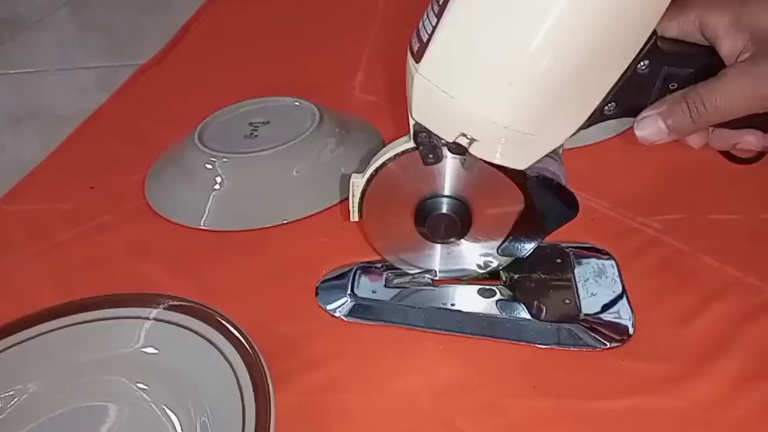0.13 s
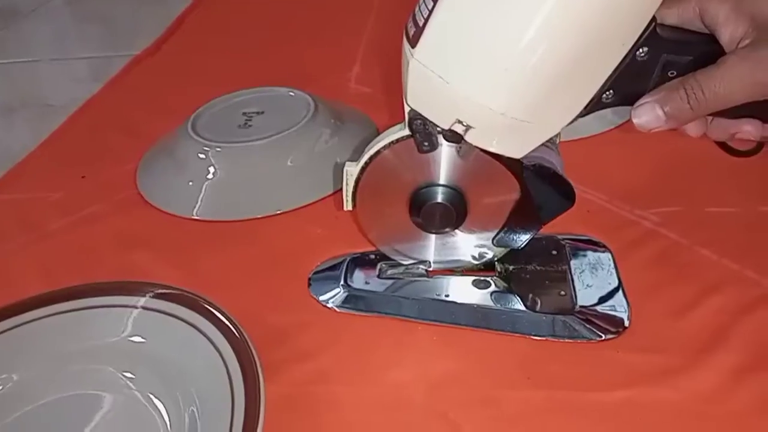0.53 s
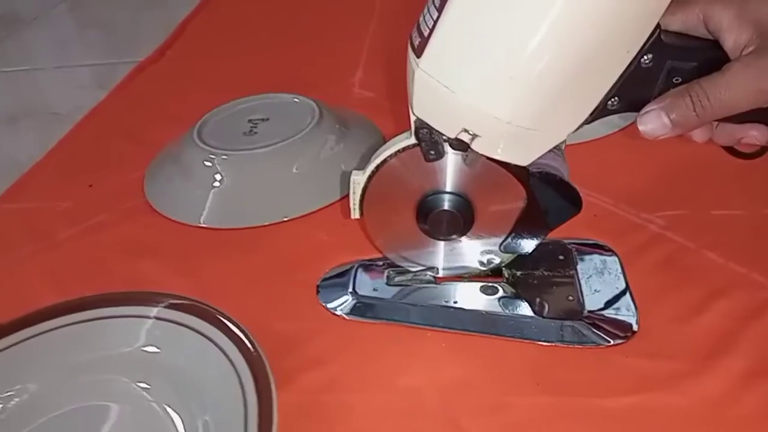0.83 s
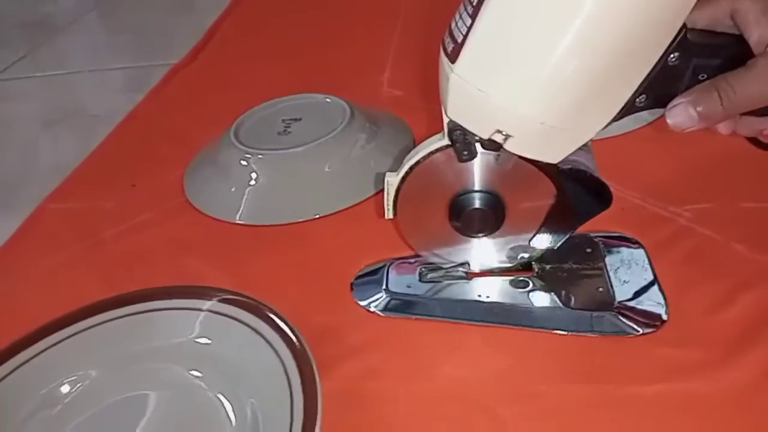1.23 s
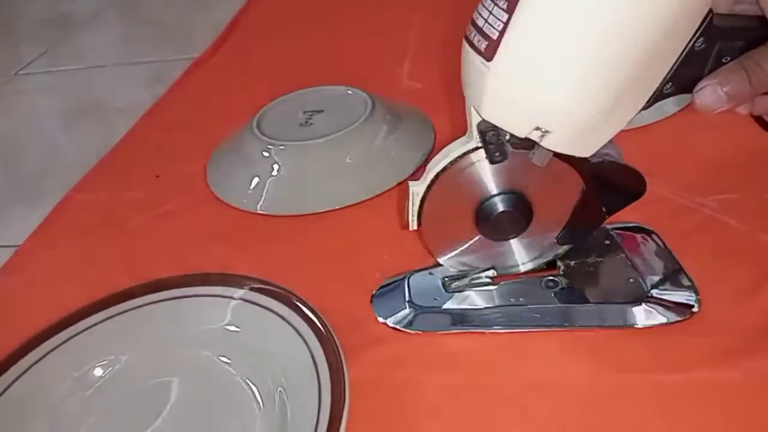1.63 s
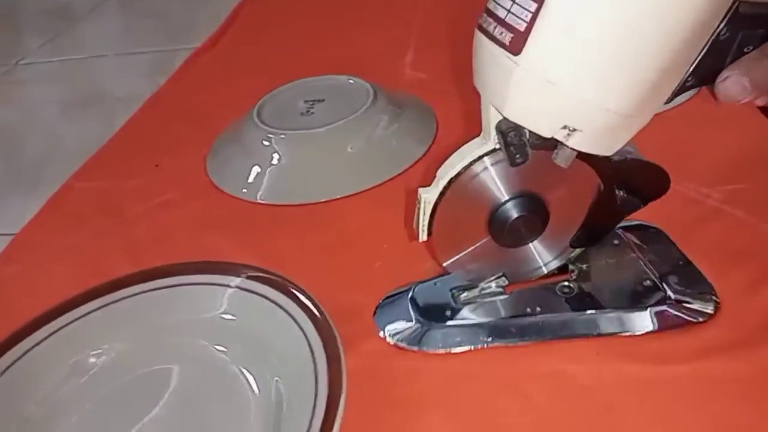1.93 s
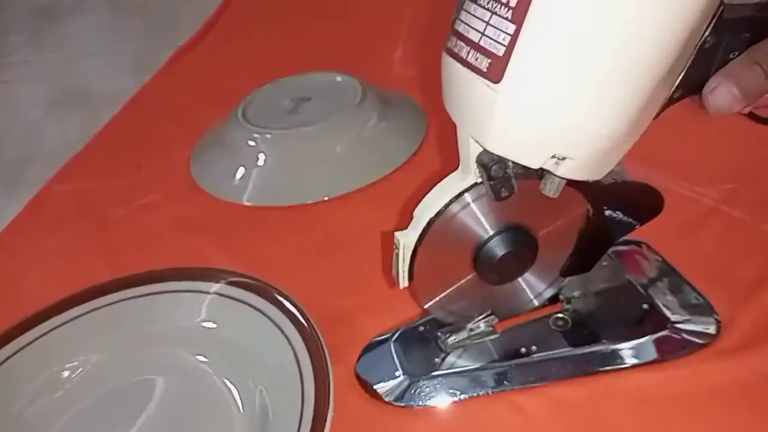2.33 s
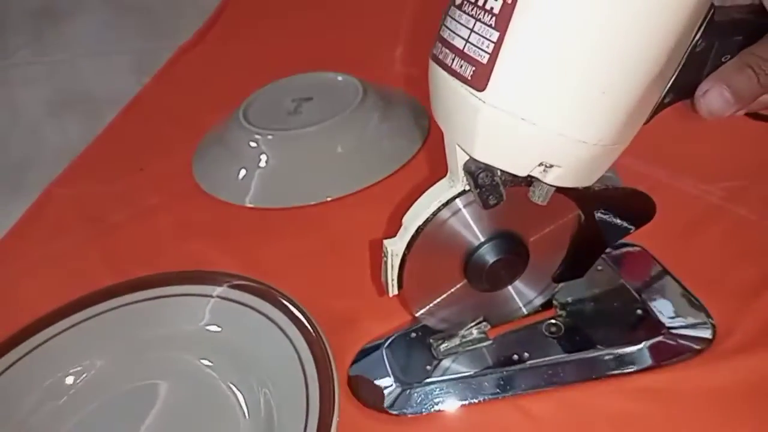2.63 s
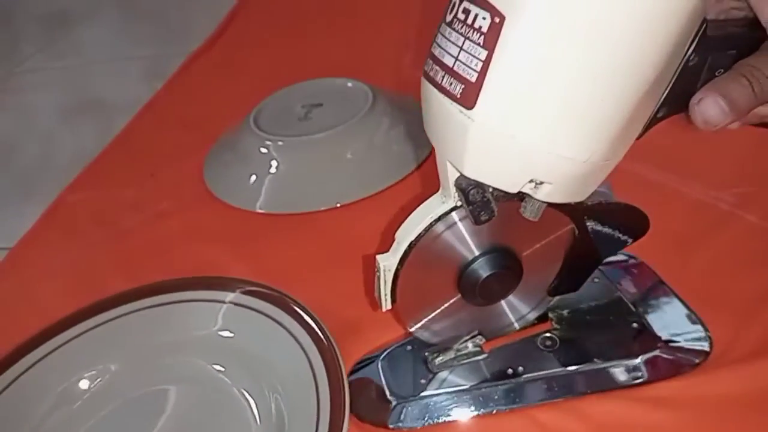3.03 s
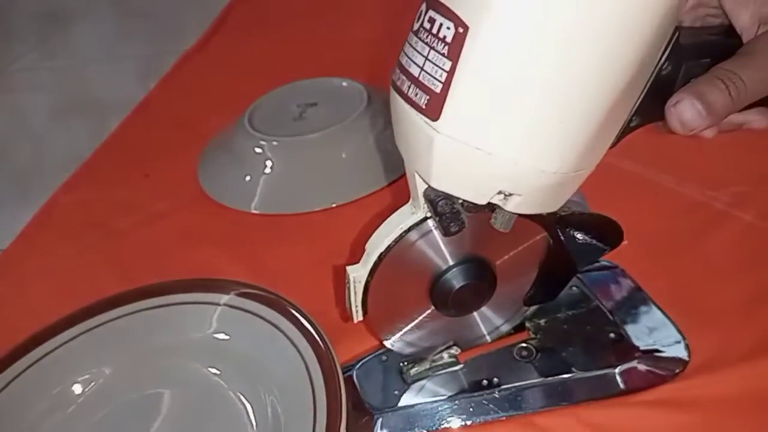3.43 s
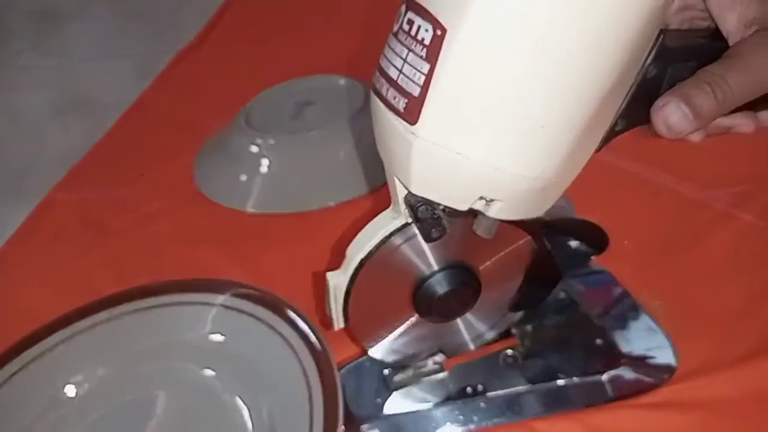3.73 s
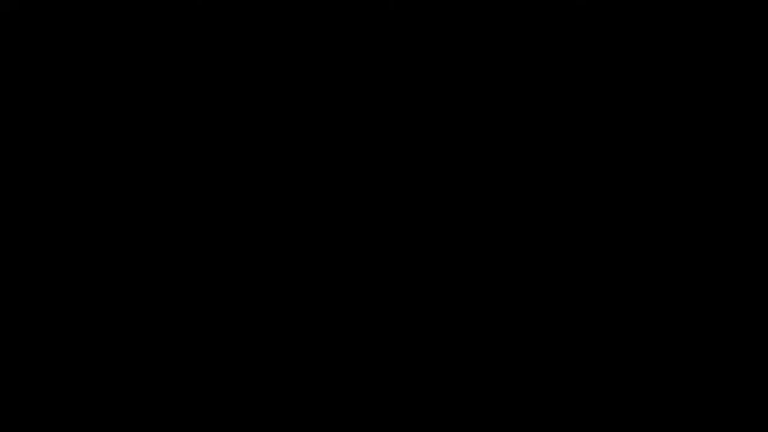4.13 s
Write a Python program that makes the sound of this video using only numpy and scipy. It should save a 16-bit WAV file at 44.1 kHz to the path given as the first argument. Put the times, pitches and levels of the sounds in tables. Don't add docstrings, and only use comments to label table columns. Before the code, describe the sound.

The sound fades in from silence over roughly 0.1-0.3 s: a small fast brushed motor in a round-blade cloth cutter, very close in a quiet room. Its pitch climbs quickly in the first second, with passing resonant swells, then creeps up only slightly. A broad, rough brush and fan hiss is strong at first, then phone noise suppression clamps it around 0.5-0.9 s, leaving thinner, streaky noise. From about 1.3 s the gear whine stands out, near 1.7 kHz, fluttering and beating over a faint low hum, with loose gear rattle and base-plate buzz. Thin steel ticks around 5-6 kHz occur irregularly from 0.3 s, clustering at 2.2-2.8 s and again around 3.7-4.1 s. Blade scraping on the guard is strongest near 3.9 s. At about 4.1 s the switch is released; whine and hiss weaken and pitch begins dropping, and the sound ends at about 4.3 s before it stops.

```python
import sys
import numpy as np
from scipy import signal
from scipy.fft import rfft, irfft
from scipy.io import wavfile
from scipy.ndimage import uniform_filter1d, map_coordinates

SR = 44100
rng = np.random.default_rng(int(sys.argv[2]) if len(sys.argv) > 2 else 0)


def volts(x):
    e = np.asarray(x, float) / 20
    return 10 ** e


def dump(signal):
    limited = np.clip(np.atleast_2d(signal).T, -1, 1)
    pcm = np.round(limited * 32767).astype(np.int16)
    wavfile.write(sys.argv[1], SR, pcm)


N = 189144
T = np.arange(N) / SR


def unit(x):
    return x / np.sqrt(np.mean(x ** 2) + 1e-20)


def curve(rows):
    time_s, value = np.transpose(rows)
    return np.interp(T, time_s, value)


def along(points, hz):
    point_hz, value = np.transpose(points)
    return np.interp(np.log(hz + 1), np.log(point_hz), value)


def step(x, width):
    return .5 + .5 * np.tanh(x / abs(width))


def wobble(rate):
    knots = rng.standard_normal(int(N * rate / SR) + 4)
    return map_coordinates(knots, [T * rate], order=1)


def window(start_s, end_s, ramp_s):
    return np.clip(np.minimum(T - start_s, end_s - T) / ramp_s, 0, 1)


def filtered(x, order, hz, kind):
    return signal.sosfilt(signal.butter(order, hz, kind, fs=SR, output="sos"), x)


def patchy(depth_db):
    z = signal.stft(rng.standard_normal(N + 1024), nperseg=1024)[2]
    field = uniform_filter1d(rng.standard_normal(z.shape), size=3, axis=0)
    field = uniform_filter1d(field, size=5, axis=1)
    return signal.istft(z * volts(depth_db * unit(field)), nperseg=1024)[1][:N]


# pitch_hz [Hz], level_db [dB per Hz]
CASING_LOW = [(35, -78), (60, -36), (183, -4), (245, -2), (313, -20.5), (512, -17.5), (688, -15.5),
              (746, -20), (986, -18), (1240, -5.5), (1440, -11.5), (1720, -4.5), (1810, -5), (2160, -12.5),
              (3000, -16), (3900, -55), (6600, -120)]
CASING_MID = [(1530, -44), (2600, -15), (3330, -10), (3490, -12), (3620, -8.5), (4040, -5.5), (4430, -8),
              (4700, -12), (5060, -4.5), (5330, -4), (6060, 0), (6490, -5.5), (6670, -11.5), (7210, -14.5),
              (7800, -23), (10100, -50), (17200, -120)]
CASING_HIGH = [(4120, -38), (7000, 5), (8190, -23.5), (9240, -11), (10700, -0.5), (11900, -4),
               (12500, -14.5), (13700, -42), (14900, -13), (15600, -5.5)]
# pitch_hz [Hz], width_hz [Hz], level_db [dB]
PANELS = [(442, 87, 4.5), (506, 11, 6), (727, 32, 4), (1300, 9.5, 3), (1735, 42, 2.5), (1880, 61, 2.5),
          (2657, 82, 5), (3510, 24, 6.5), (3850, 11, -5), (3863, 130, 3.5), (4066, 79, 5.5), (4340, 55, 7),
          (4674, 130, 7.5), (5050, 32, -2.5), (5520, 17, -1), (6330, 20, -5)]


def casing_db(hz):
    ranges = [along(CASING_LOW, hz), along(CASING_MID, hz) - 8]
    broad = np.select([hz < 2900, hz < 7700], ranges, along(CASING_HIGH, hz) - 15)
    peaks = sum(db / (1 + (2 * (hz - center_hz) / width_hz) ** 2) for center_hz, width_hz, db in PANELS)
    return broad + peaks


def band(x, lo_hz, hi_hz, steep=12):
    hz = np.fft.rfftfreq(N, 1 / SR) + 1
    edges = 1 / np.sqrt((1 + (lo_hz / hz) ** steep) * (1 + (hz / hi_hz) ** steep))
    return irfft(rfft(x) * volts(casing_db(hz)) * edges, N)


OFF_S = 4.12


def speed():
    free_hz, cold_loss_hz, warm_up_s = 253.27, 8.11, 1.876
    head_start_s, spin_up_s, coast_s = .737, .901, 1.68
    warm_hz = free_hz - cold_loss_hz * np.exp(-T / warm_up_s)
    running = warm_hz * np.tanh((T + head_start_s) / spin_up_s)
    return running * np.exp(-np.maximum(T - OFF_S, 0) / coast_s)


def switched_off():
    run_down_s = 0.085
    return 1 - np.exp(-np.maximum(T - OFF_S, 0) / run_down_s)


ROCKING_SPEEDS = [200, 222, 230, 237, 243.5, 245.5, 247, 253]
ROCKING_DB = [-50.5, -52, -50, -50, -48.5, -52.5, -62, -61]


def rocking_db():
    return np.interp(speed(), ROCKING_SPEEDS, ROCKING_DB)


# time_s [s], contact_db [dB]
CONTACT = [(.3, -25), (.7, -12), (1.15, -12), (1.35, -5), (1.5, -2), (2.1, -6), (2.3, -6), (3.1, -5),
           (3.3, -2), (3.9, 2.5), (4.1, 1), (4.29, -4.5)]


def contact_db():
    return curve(CONTACT)


def tone(angle, count, db, shake, rate=30):
    phase = count * angle + shake * wobble(rate) + rng.uniform(0, 2 * np.pi)
    return np.sqrt(2) * volts(db) * np.sin(phase)


def flares(rows, rest_db, ramp_s):
    gain = volts(rest_db) + sum(volts(db) * window(start_s, end_s, ramp_s) for start_s, end_s, db in rows)
    return 20 * np.log10(gain)


def unbalance(angle):
    level_db = rocking_db()
    line = tone(angle, count=1, db=level_db + 1.2 * wobble(20), shake=.45)
    blur = unit(band(patchy(depth_db=6.5), 105, 320))
    return line + volts(0.59 * level_db - 31.0) * blur


def cage_beats(angle):
    cage = .41 * angle
    loaded_db = np.interp(T, [1.2, 2.2, 4.13, 4.2], [-8, -1.5, -2.5, -10])
    # order, side, dB
    sidebands = [(7, 1, -47), (7, -1, -50), (8, -1, -53.0), (13, 1, -82.0), (20, 1, -66),
                 (7.5, 1, -78.0), (8, -1, -82)]
    out = np.zeros(N)
    for order, side, db in sidebands:
        level_db = db + loaded_db + 1.5 * wobble(20)
        out += tone(order * angle + side * cage, count=1, db=level_db, shake=1.2, rate=50)
    return out


# time_s [s], level_db [dB]
MESH = [(.3, -65), (.55, -40.5), (.8, -57), (.92, -46.5), (1.05, -60), (1.28, -54), (1.38, -39),
        (1.8, -35.5), (2.2, -37.5), (2.3, -45), (2.8, -41), (2.92, -46.5), (3.2, -43.5), (3.44, -37.5),
        (3.68, -49), (3.85, -40.5), (4.08, -39), (4.29, -54)]
# start_s [s], end_s [s], level_db [dB]
FIFTH = [(.5, .66, -57), (.76, .84, -49.5), (.94, 1.02, -45.5), (2.08, 2.16, -51.5), (2.24, 2.33, -51),
         (2.43, 2.51, -48), (2.59, 2.71, -46), (2.84, 3.07, -52.5), (3.28, 3.38, -54), (3.68, 3.87, -56),
         (4.03, 4.11, -50), (4.2, 4.35, -49)]
# start_s [s], end_s [s], level_db [dB]
EIGHTH = [(.2, .48, -47), (.61, .75, -43.5), (1.15, 1.45, -51), (2.35, 2.53, -42.5), (2.53, 2.64, -46.5),
          (2.74, 2.92, -46.5), (2.92, 3.24, -45), (3.24, 3.4, -46), (3.5, 3.6, -55.5), (3.74, 3.9, -47.5),
          (4.03, 4.14, -51), (4.22, 4.35, -48.5)]


def whine(angle):
    mesh_db = curve(MESH) - 5 * switched_off()
    fifth_db = flares(FIFTH, rest_db=-78, ramp_s=0.027)
    eighth_db = flares(EIGHTH, rest_db=-87, ramp_s=0.043)
    mesh = tone(angle, count=7, db=mesh_db + .5 * wobble(25), shake=.25)
    fifth = tone(angle, count=5, db=fifth_db + 3 * wobble(25), shake=.8, rate=70)
    eighth = tone(angle, count=8, db=eighth_db + 2 * wobble(30), shake=1.0, rate=55)
    return mesh + cage_beats(angle) + unbalance(angle) + fifth + eighth


def comb(angle):
    return sum(tone(angle, count=k, db=3.5 * wobble(9), shake=.5) for k in range(2, 62))


# [dB, change once off]
HISS_LAYERS = [
    (-40, 0.752, -46.5, -51, 5.5),
    (-39.5, 0.686, -49, -49.5, -2.5),
    (-37.5, 0.74, -40, -40.5, -2.5),
    (-43, 0.64, -50.5, -42.5, -5.5),
]


def hiss_levels():
    clamp_width_s, settle_s = .022, .8
    contact_share = [0.015, 0.028, 0.13, 0.022]
    for (open_db, clamp_s, after_db, settled_db, off_db), feel in zip(HISS_LAYERS, contact_share):
        settling = np.exp(-np.maximum(T - clamp_s, 0) / settle_s)
        held_db = settled_db + (after_db - settled_db) * settling
        level_db = open_db + (held_db - open_db) * step(T - clamp_s, clamp_width_s)
        yield level_db + off_db * switched_off() + feel * (contact_db() + 8)


def hiss(angle):
    out = np.zeros(N)
    orders = unit(comb(angle)) * (1 + 0.77 * step(.72 - T, .05))
    pulse = 1 + .16 * np.sin(angle) + .16 * np.sin(2 * angle) + .2 * np.sin(.69 * angle)
    shared_db = 0.36 * wobble(40)
    layers = [(310, 950, 1.64, 1.0, -0.5, 0.2), (950, 2900, 3.1, 0.75, 3.5, 0.17),
              (3750, 7800, 2.6, 1.7, -2.1, 0.29), (7800, 17000, 1.3, 0.71, -0.1, 0.21)]
    for level_db, (lo_hz, hi_hz, depth_db, flutter_db, trim_db, share) in zip(hiss_levels(), layers):
        noise = patchy(depth_db) * pulse * volts(flutter_db * wobble(350))
        layer = band(unit(noise) + share * orders, lo_hz, hi_hz, steep=13.1)
        out += volts(level_db + trim_db + shared_db) * unit(layer)
    return out


# pitch_hz [Hz], level_db [dB per Hz]
RAW = [(180, -63), (300, -28), (424, -1.5), (697, -2), (893, -6), (1850, -8.5), (2250, -14), (3080, -15.5),
       (6070, -5), (8040, -17), (10600, -11), (13900, -19), (15600, -32)]
# pitch_hz [Hz], clamp_s [s]
LEARNT = [(400, 1), (900, 0.7), (1500, 0.874), (3200, 0.757), (6500, 0.68), (8200, 0.52), (11000, 0.36),
          (15000, 0.71)]
# after_clamp_s [s], level_db [dB]
LET_THROUGH = [
    (-.5, -35.5),
    (-.03, -39),
    (.04, -75),
    (1.1, -64.5),
    (1.6, -50.5),
    (3.6, -49),
]


def raw_noise(angle):
    flutter = volts(3.2 * wobble(300)) * (1 + .5 * np.sin(angle))
    noise = rng.standard_normal(N + 512) * np.pad(flutter, (0, 512))
    hz, time_s, z = signal.stft(noise, SR, nperseg=512)
    colour = unit(volts(along(RAW, hz)))
    gate_db = np.interp(time_s - along(LEARNT, hz)[:, None], *np.transpose(LET_THROUGH))
    gated = signal.istft(z * colour[:, None] * volts(gate_db), nperseg=512)[1][:N]
    return volts(-9 * switched_off()) * gated


def sparks():
    spitting = rng.standard_normal(N) * volts(3.5 * wobble(45) + 4 * wobble(110))
    sizzling = rng.standard_normal(N) * volts(2.5 * wobble(55) + 3 * wobble(120))
    bursts = unit(filtered(spitting, 6, 14600, "high"))
    sizzle = unit(filtered(sizzling, 6, 12200, "high"))
    return volts(-49) * bursts + volts(-71) * sizzle


def deep_noise():
    low = filtered(rng.standard_normal(N), 4, 55, "low")
    table = filtered(rng.standard_normal(N), 2, (75, 210), "band")
    jolt_db = 5 * np.exp(-T / 0.33)
    dip_db = -19 * step(T - 1.7, 0.094) * step(2.02 - T, .03)
    shaken_db = jolt_db + dip_db
    thrum_db = -77.5 + .6 * (rocking_db() + 58)
    table_db = thrum_db + shaken_db - 6 * switched_off() + 4.8 * wobble(15)
    low_db = -83 + .3 * shaken_db + 4.5 * wobble(7.2)
    return volts(low_db) * unit(low) + volts(table_db) * unit(table)


def grind(angle):
    rattle_db = -56.5 + 11.5 * step(speed() - 243.5, 3.4) + 2 * wobble(4.11)
    plate_db = -50.5 - 30 * np.exp(-T / 0.53) - 1 * T - 8 * switched_off()
    scrape_db = -40 + 1.06 * contact_db() - 4 * switched_off()
    rattle = band(patchy(depth_db=1.0), 1545, 2230, steep=21)
    plate = band(patchy(depth_db=4.5) * (1 + 0.41 * np.sin(angle)), 2960, 3890, steep=24)
    scrape = band(patchy(depth_db=2.5) * (1 + 0.21 * np.sin(2 * angle)), 5160, 6130, steep=70)
    return volts(rattle_db) * unit(rattle) + volts(plate_db) * unit(plate) + volts(scrape_db) * unit(scrape)


SWELL_ORDERS = [24, 25, 25, 26, 28, 29, 52, 51, 50, 53, 2, 3, 13, 14, 14, 16, 16, 4, 9, 33, 36, 39, 6, 11,
                3, 11, 14.41, 37, 49, 7.59]
# start_s [s], end_s [s], level_db [dB]
SWELLS = [(.78, 1.55, -47.5), (.46, .9, -45), (.93, 1.45, -50.5), (.78, 1.03, -51), (.47, .74, -50),
          (.26, .57, -48), (.26, .68, -50), (.7, 1.2, -67), (.28, .66, -53), (.28, .55, -54),
          (.28, 1.0, -49), (1.2, 1.78, -52), (1.54, 1.89, -57), (2.6, 3.0, -60), (3.5, 4.0, -62),
          (1.96, 2.11, -52), (3.95, 4.15, -52), (.06, .36, -46), (.35, .65, -46), (.5, 2.2, -73),
          (.5, 1.4, -73), (.9, 4.1, -70), (.24, .48, -48), (1.15, 1.45, -59), (1.75, 4.29, -63),
          (.72, .99, -60), (1.72, 1.92, -53), (.3, .9, -70), (.3, .7, -55), (3.68, 4.0, -47)]


def swells(angle):
    out = np.zeros(N)
    for order, (start_s, end_s, db) in zip(SWELL_ORDERS, SWELLS):
        line = tone(angle, count=order, db=db + 2.5 * wobble(25), shake=.6)
        out += window(start_s, end_s, ramp_s=.08) * line
    return out


# time_s [s], peak_db [dB], ring_hz [Hz]
TICKS = [(.2953, -15, 6100), (.3737, -20, 5840), (0.587, -16, 5440), (0.6678, -14.5, 5770),
         (0.9424, -23, 5730), (0.9667, -18, 5800), (1.1688, -17.5, 5700), (1.5141, -19, 6460),
         (1.8672, -16, 5660), (1.9107, -20, 5480), (2.189, -17, 6370), (2.2604, -13.5, 6360),
         (2.3236, -15, 6000), (2.3887, -20, 5660), (2.458, -14, 6070), (2.647, -14.5, 6100),
         (2.5907, -12.5, 6080), (2.6543, -11, 6100), (2.7915, -19, 6030), (3.0536, -15.5, 6050),
         (3.2043, -19, 5700), (3.2095, -14, 5760), (3.3958, -16, 5620), (3.778, -13, 5600),
         (3.6552, -26, 5370), (3.6667, -13.5, 5430), (3.7224, -15, 5690), (3.7996, -14.5, 5400),
         (3.985, -18, 5860), (4.0874, -14, 6100)]


def ticks():
    out = np.zeros(N + SR)
    t = np.arange(SR // 40) / SR
    envelope = (1 - np.exp(-t / 0.00054)) * volts(-60 * t / 0.0074)
    chance = rng.uniform(size=(60, 3))
    grazes = [(.3 + 3.85 * a, -33.5 - 3 * np.log(b), 5300 + 1100 * c) for a, b, c in chance]
    for time_s, peak_db, ring_hz in [*TICKS, *grazes]:
        plate_db = (-4.5 if time_s < 1.7 else -14) + rng.normal(0, 2)
        plate = volts(plate_db) * np.sin(2 * np.pi * rng.uniform(4200, 4800) * t)
        crack = 0.08 * rng.standard_normal(len(t))
        ring = np.sin(2 * np.pi * ring_hz * t) + plate + crack
        out[round(time_s * SR):][:len(t)] += volts(peak_db - 3.5) * envelope * ring
    return filtered(out[:N], 4, 2500, "high")


def scene():
    angle = 2 * np.pi * np.cumsum(speed()) / SR
    motor = whine(angle) + swells(angle) + sparks()
    noise = hiss(angle) + raw_noise(angle) + deep_noise()
    contact = grind(angle) + ticks()
    return (motor + noise + contact)[None]


def suppressor(x, strength):
    time_s, z = signal.stft(x, SR, nperseg=1024)[1:]
    now = uniform_filter1d(abs(z) ** 2, size=4, axis=-1)
    usual = uniform_filter1d(now, size=30, axis=-1)
    usual = uniform_filter1d(usual, size=16, axis=-2)
    working = strength * np.clip((time_s - .55) / .2, 0, 1)
    gain = np.clip(abs(now) / (abs(usual) + 1e-14), .05, 3) ** working
    return signal.istft(z * gain, nperseg=1024)[1][..., :N]


def low_pass(x):
    return signal.sosfilt(signal.butter(12, 15710, fs=SR, output="sos"), x)


def record(dry):
    fade_start_s, fade_s, band_limit_hz = .12, .19, 15510
    u = np.clip((T - fade_start_s) / fade_s, 0, 1)
    fade = u ** 4.0 + 0.04 * u * (1 - u)
    spectrum = rfft(suppressor(dry, strength=.15))
    kept = irfft(spectrum * (np.fft.rfftfreq(N, 1 / SR) < band_limit_hz), N)
    return low_pass(kept * fade)


dry = scene()
out = record(dry)
dump(out)
```